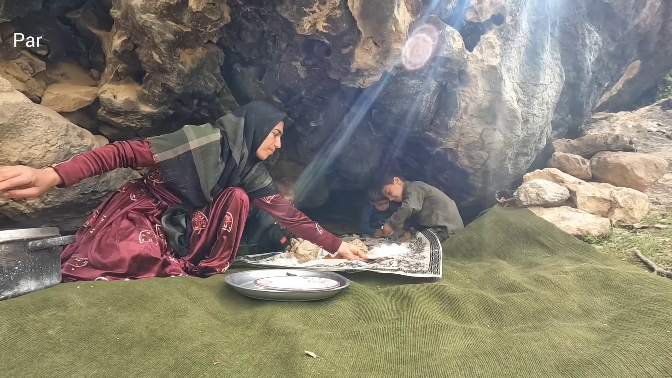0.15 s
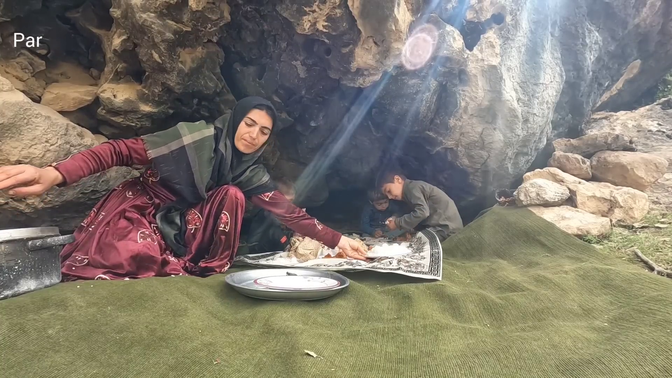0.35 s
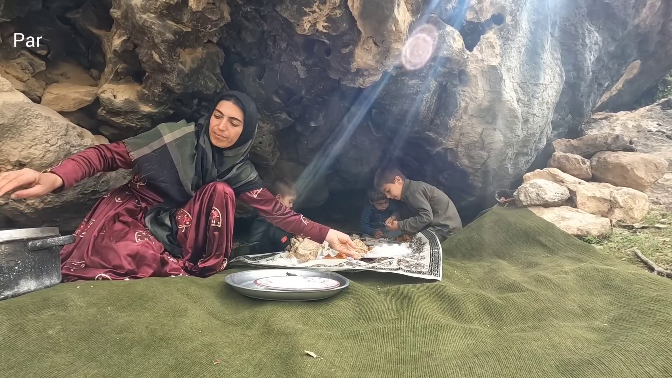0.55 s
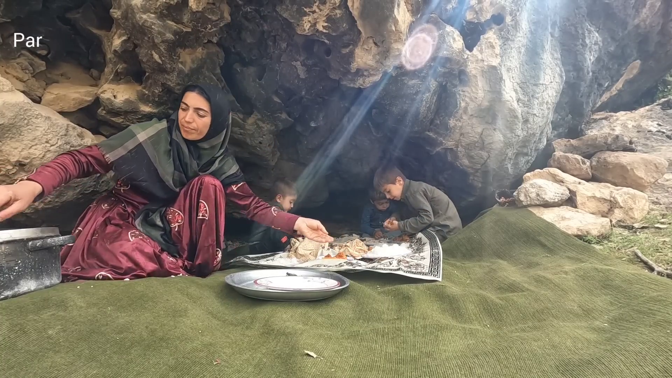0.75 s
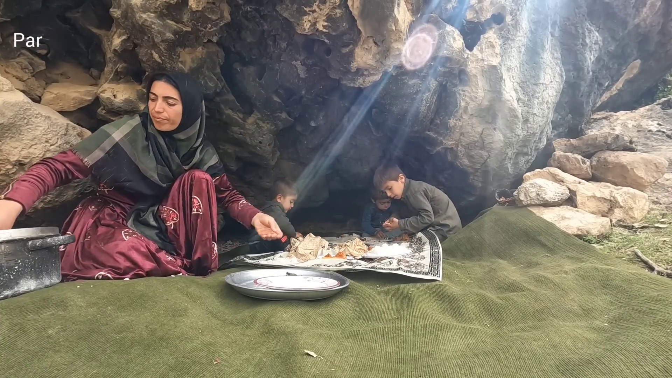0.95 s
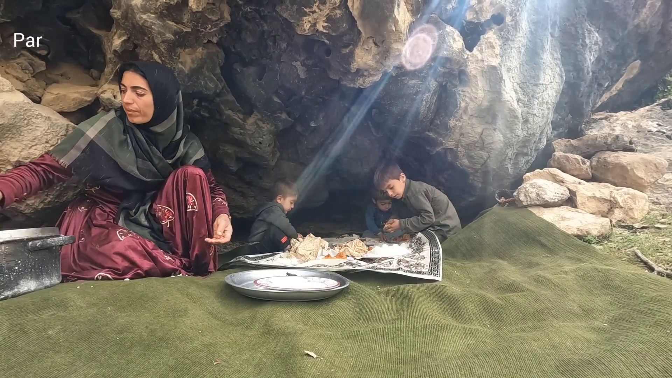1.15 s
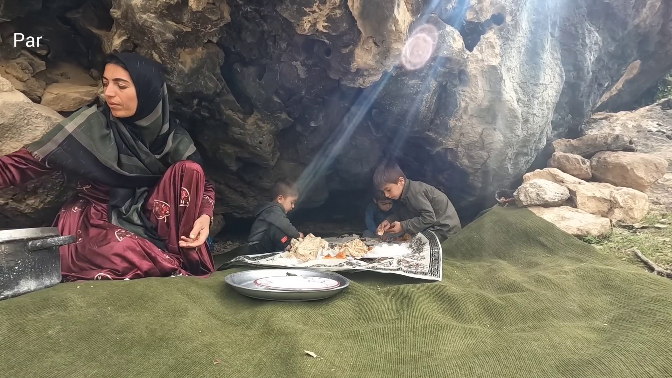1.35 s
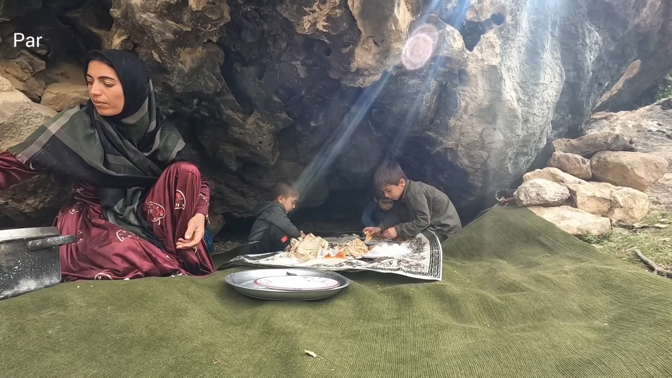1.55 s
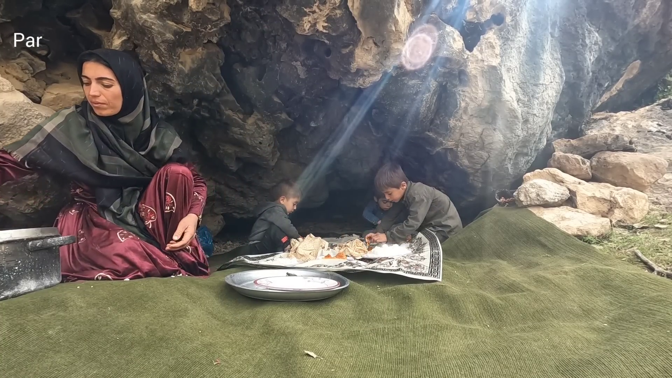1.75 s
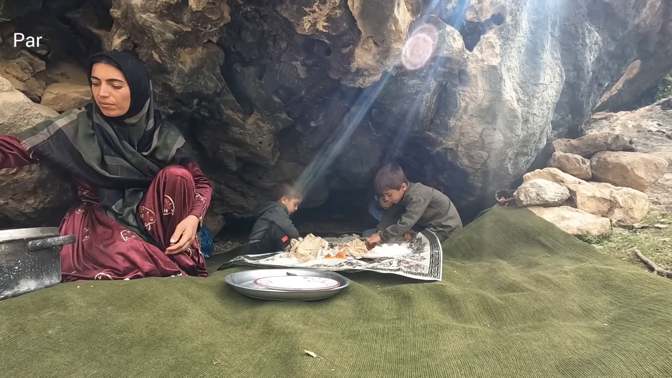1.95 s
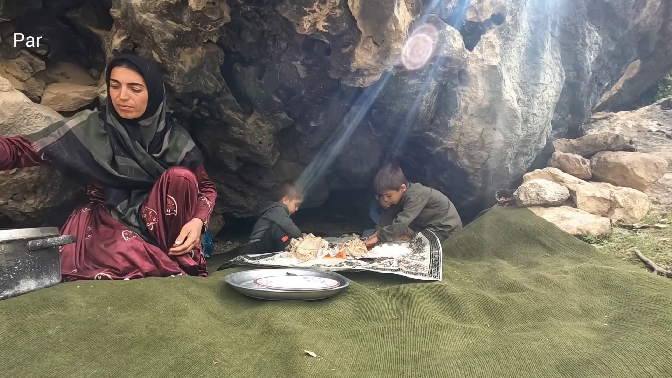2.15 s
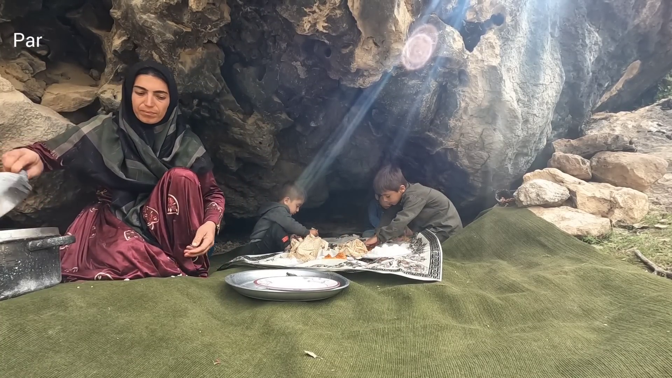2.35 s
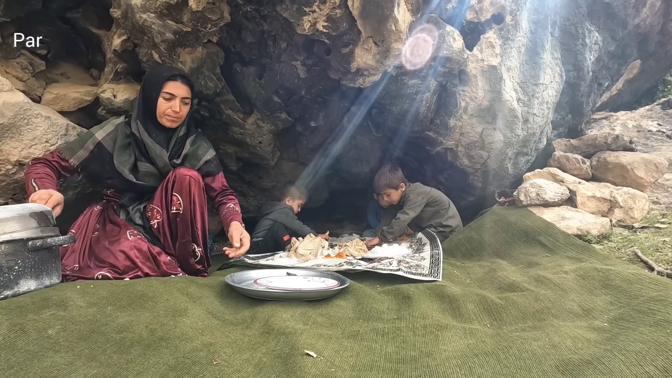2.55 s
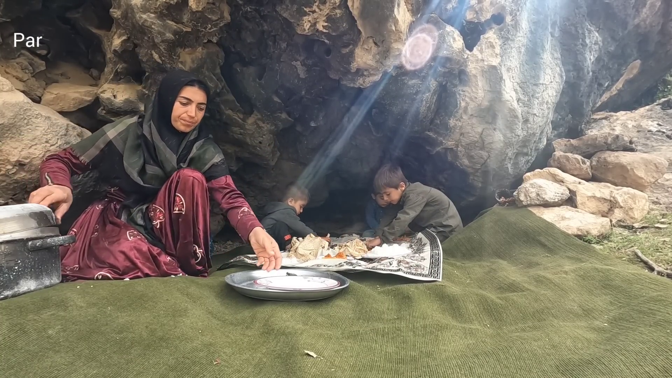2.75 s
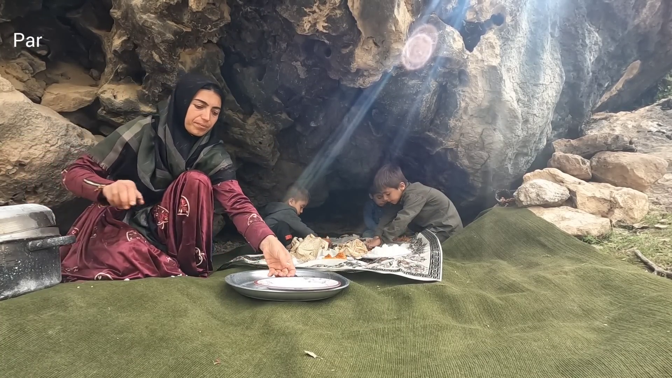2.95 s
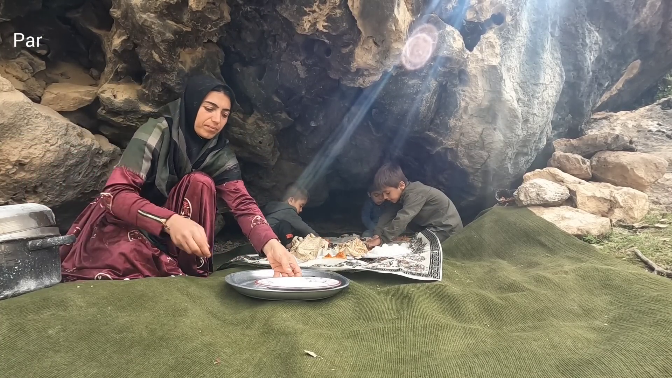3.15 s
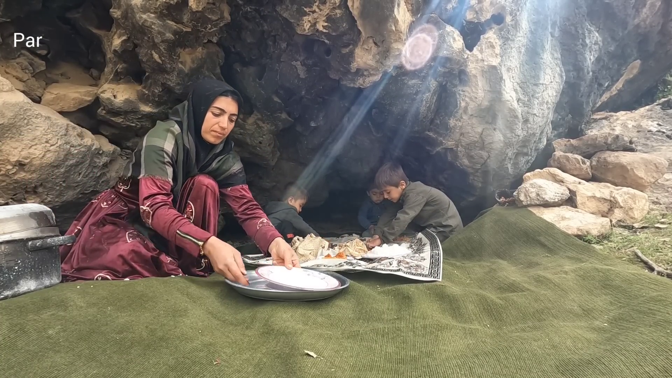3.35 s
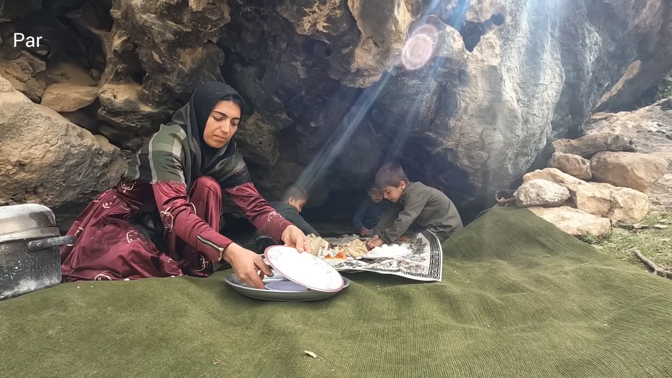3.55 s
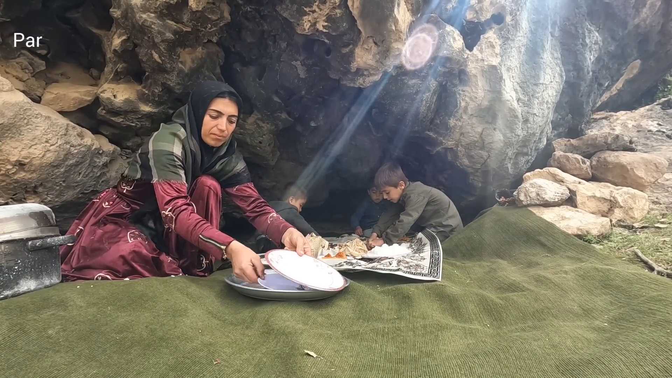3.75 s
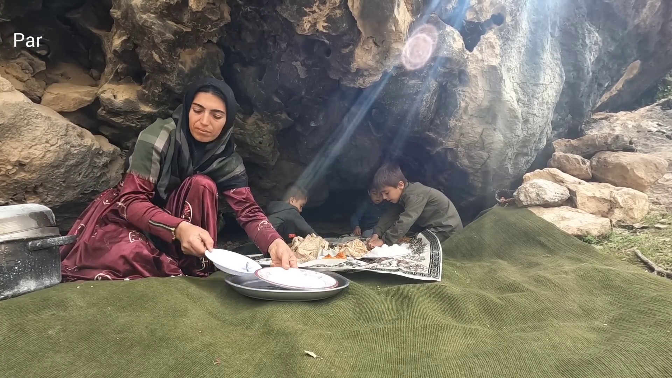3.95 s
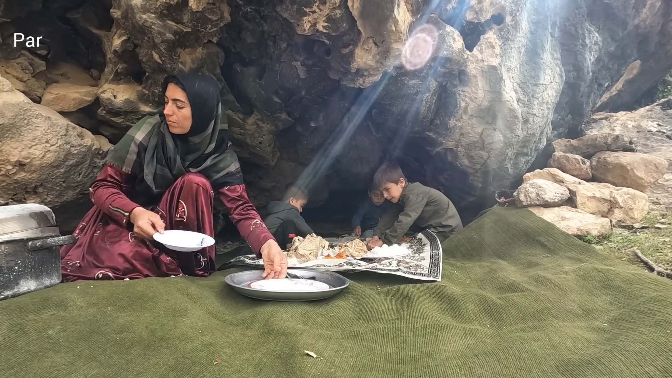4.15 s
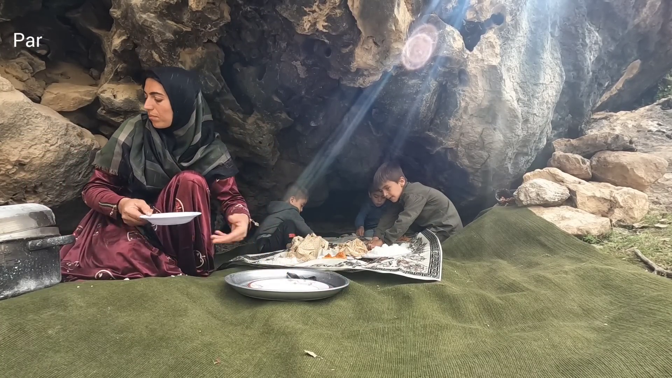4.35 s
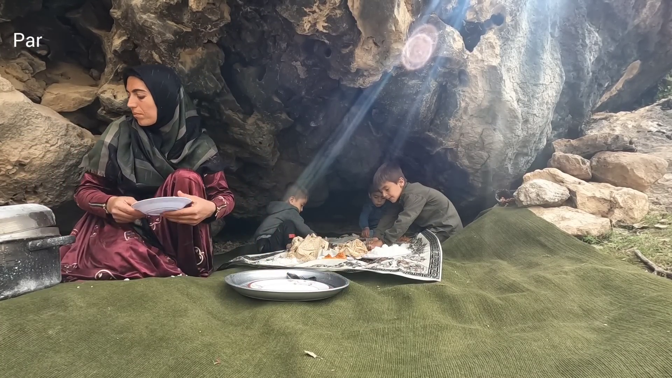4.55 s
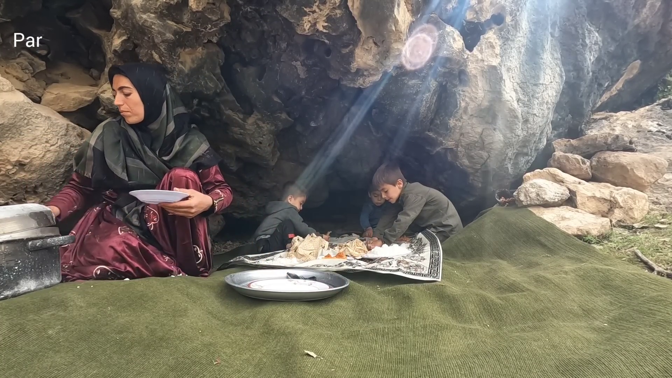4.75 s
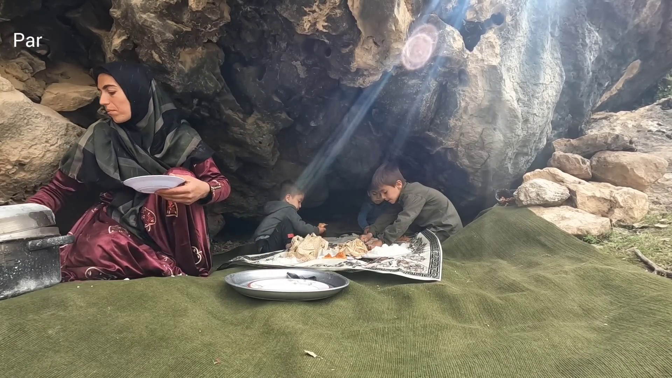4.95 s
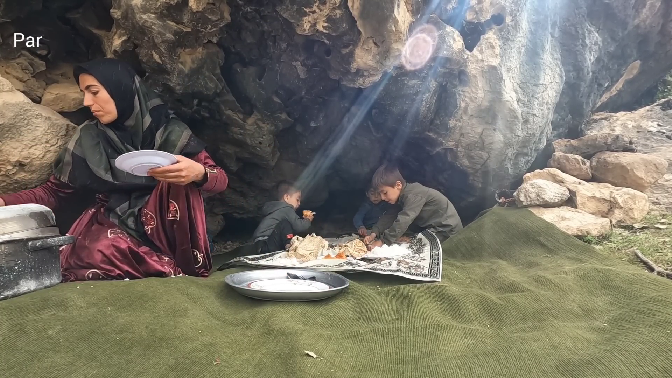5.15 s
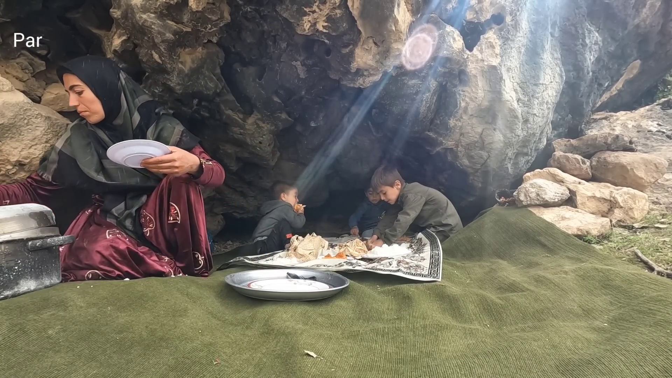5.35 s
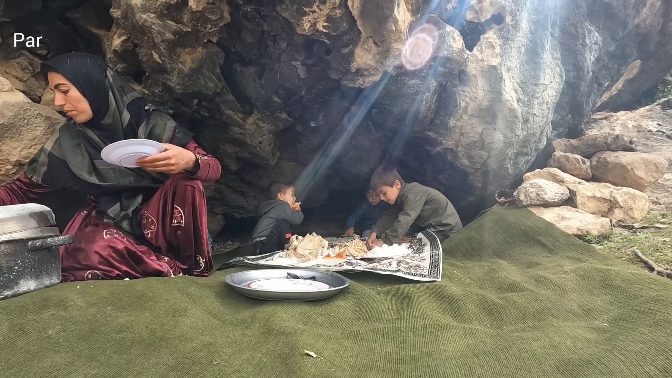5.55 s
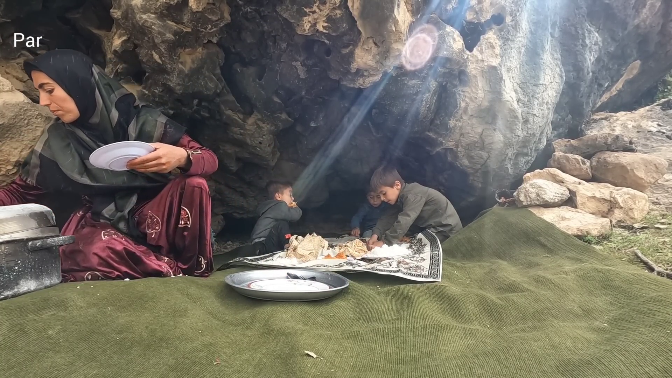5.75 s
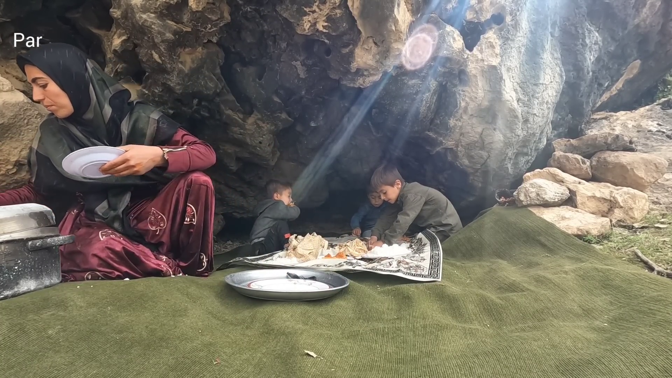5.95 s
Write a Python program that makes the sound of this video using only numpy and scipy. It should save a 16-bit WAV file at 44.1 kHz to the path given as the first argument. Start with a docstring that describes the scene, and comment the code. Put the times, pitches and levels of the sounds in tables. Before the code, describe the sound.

Outdoors under rock, faint dish taps and a distant bird, then a metal lid clangs onto a pot, plates clatter on a tray, and the lid rings.

```python
"""A metal lid dropped onto a cooking pot is the main source of a meal on a carpet under a rock overhang.
Small taps, a scraping spoon and a far bird come first; then plates knock and slide on a metal tray, and the
lid is shifted and rings. Impacts sum decaying modes and banded noise, friction feeds random slips to
resonators, the bird is a sum of harmonics through a throat resonance, and the air is filtered noise."""
import sys
import numpy as np
from scipy import signal
from scipy.fft import rfft, irfft, next_fast_len
from scipy.io import wavfile

SR = 44100
rng = np.random.default_rng(int(sys.argv[2]) if len(sys.argv) > 2 else 0)


def dump_mix(stems):
    """Bounce the given channels to the path in sys.argv[1] as a 16-bit WAV at rate SR."""
    frames = np.atleast_2d(stems).T  # one column per channel
    limited = np.clip(frames, -1, 1)  # hard clip at full scale
    pcm = np.round(limited * 32767).astype(np.int16)
    wavfile.write(sys.argv[1], SR, pcm)


N = 268833

# Source levels are relative: the gain on each layer and the final rounding of peaks come after them.


def from_db(db):
    """Level to amplitude ratio: 20 dB for each factor of ten."""
    return np.exp(np.asarray(db) * (np.log(10) / 20))


def rms_one(x):
    """Normalisation to unit root mean square."""
    return x / np.sqrt(np.mean(x ** 2) + 1e-20)


def seconds():
    """The time axis of the whole scene, in s."""
    return np.arange(N) / SR


def ages(length_s):
    """Time elapsed since an onset, in s."""
    return np.arange(int(length_s * SR) + 2) / SR


def add(out, start, sound):
    """Linear superposition: mix a sound in from a start time in s."""
    part = out[round(start * SR):][:len(sound)]
    part += sound[:len(part)]


def butter(x, hz, kind, order=3):
    """Maximally flat band selection."""
    return signal.sosfilt(signal.butter(order, hz, kind, fs=SR, output="sos"), x)


def coloured(x, spectrum, share=1):
    """Linear filtering: a (f/Hz, level/dB) table, interpolated over log frequency, weights the spectrum."""
    size = next_fast_len(len(x) + 4096, real=True)
    hz, db = np.transpose(spectrum)
    log_hz = np.log(np.maximum(np.arange(size // 2 + 1) * SR / size, 1))
    gain = from_db(share * np.interp(log_hz, np.log(hz), db))
    return irfft(rfft(x, size) * gain, size)[:len(x)]


def resonate(x, hz, width_hz):
    """A damped resonator: two poles whose radius sets the bandwidth, with gain 1 on top."""
    r = np.exp(-np.pi * width_hz / SR)
    zeros = np.array([1, 0, -1]) * (1 - r * r) / 2
    poles = [1, -2 * r * np.cos(2 * np.pi * hz / SR), r * r]
    return signal.lfilter(zeros, poles, x + 1e-18)


def waver(corner_hz):
    """Slow random modulation: noise through two equal poles, drawn at every 40th sample; rms 1."""
    r = np.exp(-80 * np.pi * corner_hz / SR)
    slow = signal.lfilter([1], [1, -2 * r, r * r], rng.standard_normal(N // 40 + 502))[500:]
    return np.interp(np.arange(N) / 40, np.arange(len(slow)), rms_one(slow))


def burst(t60):
    """Diffuse reverberation: exponentially decaying noise of unit energy."""
    t = ages(t60)
    tail = rng.standard_normal(len(t)) * np.exp(-np.log(1000) * t / t60)
    return tail / np.linalg.norm(tail)


def ring(hz, t60, contact_s=0.0025):
    """Modal vibration: a sinusoid built up during the contact under an exponential decay."""
    t = ages(t60)
    decay = np.exp(-np.log(1000) / t60 * t)
    return np.sin(2 * np.pi * hz * t) * decay * (1 - np.exp(-t / contact_s))


def chatter(per_s, spread_db, smooth, size=N):
    """Random micro-impacts: uneven contacts of two hard surfaces over a smooth rub; rms 1."""
    chance, sizes, rub = rng.random(size), rng.exponential(1, size), rng.standard_normal(size)
    contacts = from_db(spread_db * np.minimum(sizes, 3)) * np.sign(rub) * (chance < per_s / SR)
    return rms_one(rms_one(contacts) + smooth * rub)


USUAL_BLOW_DB = -30


def blows_of(knocks, ring_db, ring_follows, thud_db, thud_follows, cushion, t60):
    """Impact scaling: strength drives ring and thud, hardness trades thud for treble.

    Rows: t/s, ring/dB, thud/dB, body/dB, bright/dB, t60/s."""
    blows = []
    for start, db, hard_db in knocks:
        excess_db = db - USUAL_BLOW_DB
        thud = thud_db + thud_follows * excess_db - cushion * hard_db
        blows.append((start, ring_db + ring_follows * excess_db, thud, db, db + hard_db, t60))
    return blows


THUD_HZ, BRIGHT_HZ = 450, 2500   # edges of the thud, body and bright bands


def clatter(blows, colour, modes, metal, thud_life, bright_life, onset_s):
    """High modal density: coloured noise stands for crowded modes, and three bands decay at their own rates."""
    rattle = chatter(per_s=3100, spread_db=4.5, smooth=0.96)
    body = sum(resonate(signal.unit_impulse(SR // 10), hz, 21.0) for hz, _, _ in modes)
    rattle = coloured(rattle + metal * signal.oaconvolve(rattle, body)[:N], colour)
    thud = butter(rattle, THUD_HZ, "low")
    middle = butter(rattle, [THUD_HZ, BRIGHT_HZ], "band")
    bright = butter(rattle, BRIGHT_HZ, "high")
    out = np.zeros(N)
    for k, (band, life) in enumerate(zip((thud, middle, bright), (thud_life, 1, bright_life))):
        power = np.zeros(N)   # overlapping blows add in power
        for start, _, *band_db, t60 in blows:
            t = ages(t60 * life)
            envelope = from_db(band_db[k] - 60 * t / (t60 * life)) * (1 - np.exp(-t / onset_s))
            add(power, start, envelope ** 2)
        out += rms_one(band) * np.sqrt(power)
    return out


MIDDLE_HZ = 1000   # a hard blow lifts the modes above this and lowers those below


def ringing(blows, modes, scatter_db, hardness, detune=0):
    """Modal excitation: harder blows favour high modes; each contact loads the body a little differently."""
    out = np.zeros(N)
    usual_db = np.mean([bright_db - body_db for _, _, _, body_db, bright_db, _ in blows])
    for start, ring_db, _, body_db, bright_db, _ in blows:
        excess_db = hardness * (bright_db - body_db - usual_db)
        chances = rng.standard_normal((len(modes), 2))
        for (hz, mode_db, t60), (luck, load) in zip(modes, chances):
            tilt_db = excess_db * np.log2(hz / MIDDLE_HZ)
            gain = from_db(ring_db + mode_db + tilt_db + scatter_db * luck)
            add(out, start, gain * ring(hz * (1 + detune * load), t60))
    return out


def seated(tone, start, below_hz, db_per_s):
    """Contact damping: once a body is seated, its low modes choke."""
    free = from_db(-db_per_s * np.maximum(seconds() - start, 0))
    return free * tone + (1 - free) * butter(tone, below_hz, "high", order=4)


def rubbed(strokes, peaks, colour, per_s, rub_db, flutter_db, swell_db_per_s, release_db_per_s):
    """Friction excitation: slips feed resonances over a broad rub, swelling with the push, then dying away."""
    out = np.zeros(N)
    t = ages(1)
    knots = t[::SR // 40]   # the grip on each resonance is redrawn 40 times a second
    for start, length, db in strokes:
        slips = chatter(per_s, spread_db=1.5, smooth=0.91, size=len(t))
        grips = [np.interp(t, knots, row) for row in rng.standard_normal((len(peaks), len(knots)))]
        sung = np.zeros(len(t))
        for (hz, width_hz, peak_db), grip in zip(peaks, grips):
            sung += from_db(peak_db + flutter_db * grip) * resonate(slips, hz, width_hz)
        rub = rms_one(rms_one(sung) + from_db(rub_db) * rms_one(coloured(slips, colour)))
        fall_db = np.maximum(swell_db_per_s * (length - t), release_db_per_s * (t - length))
        add(out, start, rub * from_db(db - fall_db))
    return out


# spectrum of the open air: f/Hz, level/dB
AIR_SPECTRUM = [(13, 1.5), (22, 2.5), (97, -7.5), (192, -4), (382, -12.5), (516, -12), (560, -19.5),
                (846, -27), (1020, -18.5), (2210, -24), (2680, -24.5), (7390, -38), (11200, -55),
                (12400, -45.5), (15500, -71)]
# someone leans and reaches, stirring air and cloth: middle t/s, length t/s, level/dB
MOVES_STIRRING_AIR = [(0.06, 1, -48), (3.734, 0.97, -53), (4.335, 0.68, -47.5), (5.053, 0.5, -46),
                      (5.83, 1, -47)]
STILL_AIR_DB, HISS_DB = -54.5, -57.5
CLOTH_DB = -5.5   # rustle relative to the rumble of a movement


def air():
    """Turbulence noise: soft rumble under faint hiss; each movement adds rumble and a rustle of cloth."""
    noise = coloured(rng.standard_normal(N), AIR_SPECTRUM)
    stir = np.zeros(N)
    for middle, length, db in MOVES_STIRRING_AIR:
        stir += from_db(db) * np.cos(np.pi * np.clip((seconds() - middle) / length, -.5, .5)) ** 2
    rumble = rms_one(butter(noise, 380, "low")) * np.hypot(from_db(STILL_AIR_DB), stir)
    rumble = rumble * from_db(2 * waver(2.7))   # the air moves in soft puffs
    hiss = np.hypot(from_db(HISS_DB), from_db(CLOTH_DB + 0.83 * waver(54)) * stir)
    return rumble + hiss * rms_one(butter(noise, 255, "high"))


# small taps of spoons and dishes: t/s, level/dB, hardness (treble over body) level/dB
DISH_TAPS = [(0.068, -37.5, -12.5), (0.103, -45, -21.5), (0.138, -41, -11.5), (0.189, -35, -10.5),
             (0.231, -58, 3), (1.135, -53, 5), (1.287, -43.5, -0.5), (1.784, -58.5, -14), (1.939, -56, 12)]
# clear modes of a dish: f/Hz, level/dB, t60 t/s
DISH_RINGS = [(561, -3, 0.14), (674, -20.5, 0.5), (840, -20, 0.43), (1310, 7, 0.043), (1463, -42, 0.061),
              (2440, -8.5, 0.086), (2630, -16, .12), (3980, -25, 0.22)]
# colour of a dish's dense, short-lived modes: f/Hz, level/dB
DISH_SPECTRUM = [(47, -38), (80, -12), (193, -0.5), (314, -11.5), (556, -0.5), (1010, -8), (1500, -1.5),
                 (1870, -13), (2900, -7.5), (12400, -42.5), (15500, -68)]


def taps():
    """Impact of small bodies: light taps wake the dense and the clear modes of a dish."""
    blows = blows_of(DISH_TAPS, ring_db=-17.5, ring_follows=1.0, thud_db=-44.5, thud_follows=0.31,
                     cushion=0.49, t60=0.13)
    knocks = clatter(blows, DISH_SPECTRUM, DISH_RINGS, metal=0.71, thud_life=1.67, bright_life=0.83,
                     onset_s=0.0014)
    tone = ringing(blows, DISH_RINGS, scatter_db=5.0, hardness=0.22, detune=0.026)
    return from_db(-0.5) * knocks + from_db(-18.0) * tone


# distant bird: t/s, length t/s, start pitch f/Hz, top pitch f/Hz, level/dB
BIRD_CALLS = [(0.072, 0.19, 569.6, 746, -47), (0.72, 0.056, 758, 970, -52.5),
              (1.028, 0.062, 768, 997, -51.5)]
BIRD_ARCH_S = 0.2   # a full call rises and falls in this time; short ones break off on the way up


def bird():
    """Source and filter: hoarse arching harmonics pass a throat resonance and are smeared by the cliffs."""
    out, tremor = np.zeros(N), 1 + .022 * waver(120)
    for start, length, start_hz, top_hz, db in BIRD_CALLS:
        t = ages(length)
        arch_hz = start_hz + (top_hz - start_hz) * np.sin(np.pi * t / BIRD_ARCH_S)
        phase = 2 * np.pi * np.cumsum(arch_hz * tremor[round(start * SR):][:len(t)]) / SR
        swell = np.sqrt(np.abs(np.sin(np.pi * t / length)))
        harmonics = sum(np.sin(k * phase) for k in range(2, 6))   # the fundamental is absent
        add(out, start, from_db(db) * swell * harmonics)
    out = resonate(out, 2640, 570)
    return .5 * out + signal.oaconvolve(out, burst(t60=0.67))[:N]


# a spoon drawn across a plate: t/s, time to the peak t/s, peak level/dB
SPOON_STROKES = [(1.134, 0.041, -39)]
# resonances under the spoon: f/Hz, width f/Hz, level/dB
SPOON_RESONANCES = [(1250, 74, -5.5), (1990, 33, -17), (2300, 24, 0), (2600, 25, -1.5), (3310, 18, 0),
                    (3985, 27, -5), (4800, 11, -7), (5320, 27, -9), (5780, 74, -9), (6870, 48, -15),
                    (7700, 38, -13.5), (9910, 43, -40), (11900, 51, -22), (13900, 62, -42)]
# colour of the spoon's broad rub: f/Hz, level/dB
SPOON_SPECTRUM = [(350, -51), (600, -9), (1230, -14.5), (1660, -12), (2310, 0), (2870, -6), (5820, -23),
                  (15500, -59)]


def spoon_scrape():
    """Sliding friction: the slips of a spoon on a plate excite narrow resonances."""
    return rubbed(SPOON_STROKES, SPOON_RESONANCES, SPOON_SPECTRUM, per_s=1000, rub_db=-1.5, flutter_db=6,
                  swell_db_per_s=170, release_db_per_s=142)


# notes of a loose spoon or small dish: t/s, f/Hz, level/dB, t60 t/s
LOOSE_TINGS = [(1.29, 566, -46.5, .3), (1.29, 840, -46, 0.12), (3.235, 3000, -34, 0.058),
               (3.872, 4011, -42, 0.18), (4.119, 3872, -32, 0.17), (4.154, 3872, -18, 0.063)]


def tings():
    """Single-mode vibration: each ting of a loose piece is one or two decaying sinusoids."""
    out = np.zeros(N)
    for start, hz, db, t60 in LOOSE_TINGS:
        add(out, start, from_db(db) * ring(hz, t60))
    return out


# the lid lands on the pot and rocks on the rim, each bounce sooner and weaker than the last
LANDING_S, LANDING_DB = 2.452, -19.5
ROCK_GAP_S, ROCK_SHRINK, ROCK_LOSS_DB, ROCK_HARDNESS_DB = 0.0375, 0.93, 3.5, -3


def rocking(count):
    """Inelastic rebound: gaps shrink geometrically and levels fall by equal steps of dB."""
    k = np.arange(count)
    gaps = ROCK_GAP_S * ROCK_SHRINK ** k
    starts = LANDING_S + np.cumsum(gaps) - gaps
    return [(start, db, ROCK_HARDNESS_DB) for start, db in zip(starts, LANDING_DB - ROCK_LOSS_DB * k)]


# the lid then drops into its seat: t/s, level/dB, hardness (treble over body) level/dB
LID_SEATING = [(2.611, -28, -3), (2.669, -32.5, -5)]
# clear modes of the pot: f/Hz, level/dB, t60 t/s
POT_RINGS = [(288.8, -17.5, 0.87), (520.4, 0.5, 1), (653.5, -3.5, 0.44), (822, -1.5, 0.1),
             (886, -2.5, 0.34), (1027, -10.5, 1), (1160, -13.5, 0.79), (1488, -11.5, 0.44),
             (1598, -17, 0.43), (1775, -13.5, 0.64), (1895, -32, .5), (2033, 0, 0.047), (2390, -21, 0.15),
             (2640, -28.5, 0.24), (2873, -5, 0.19), (4350, -42, 0.4)]
# colour of the pot's dense, short-lived modes: f/Hz, level/dB
POT_SPECTRUM = [(47, -50), (80, -10), (281, -7), (456, -7), (509, -2), (594, -18), (649, -4.5), (725, -16),
                (845, -4.5), (1370, -13), (1530, -11), (2780, -25.5), (3030, -24), (12400, -42.5),
                (15500, -65)]
# the rim's hard clank at the first landing: f/Hz, level/dB, t60 t/s
RIM_CLANK = [(1420, -10.5, 0.056), (1930, -3.5, 0.05), (1978, -2.5, 0.055), (2790, -3, 0.027),
             (3100, -22, 0.033)]


def lid_drop():
    """Repeated impact: the lid rattles and settles; the pot rings from the two hardest contacts and the last."""
    blows = blows_of(rocking(count=5) + LID_SEATING, ring_db=-17.5, ring_follows=1.34, thud_db=-28.0,
                     thud_follows=-0.064, cushion=0.32, t60=0.18)
    crash = clatter(blows, POT_SPECTRUM, POT_RINGS, metal=0.77, thud_life=0.69, bright_life=0.8,
                    onset_s=0.002)
    tone = ringing(blows[:2] + blows[-1:], POT_RINGS, scatter_db=2, hardness=0.35)
    tone = seated(tone, start=2.68, below_hz=1880, db_per_s=360)
    clank = ringing(blows[:1], RIM_CLANK, scatter_db=5.5, hardness=0)
    return from_db(1.5) * crash + from_db(-14.5) * tone + from_db(-6) * clank


# the pot and the air in it boom as the lid closes; the last two rows are low thuds of handling: t/s, f/Hz,
# level/dB, rise t/s
POT_BOOMS = [(2.452, 182, -13, 0.0032), (2.630, 517, -25, 0.018), (2.672, 204, -25.5, 0.012),
             (5.204, 499, -17, 0.0086), (5.361, 492, -14, 0.0082), (5.389, 523.6, -24, 0.022),
             (5.612, 521, -37, 0.017), (5.685, 149, -37, 0.018), (5.744, 110, -32.5, 0.02)]


def booms():
    """Cavity resonance: a hollow note swells to a peak at its rise time and dies away."""
    out, t = np.zeros(N), ages(1 / 5)
    for start, hz, db, rise_s in POT_BOOMS:
        swell = (t / rise_s * np.exp(1 - t / rise_s)) ** 2
        add(out, start, from_db(db) * swell * np.sin(2 * np.pi * hz * t))
    return out


# plates against the tray: t/s, level/dB, hardness (treble over body) level/dB
TRAY_KNOCKS = [(2.984, -49, -16), (3.094, -53, -5), (3.233, -42.5, 1), (3.298, -49, -9),
               (3.343, -39, -34.5), (3.412, -27.5, -15), (3.438, -28, -11.5), (3.465, -33, -8.5),
               (3.724, -39.5, -12), (3.823, -17, -7), (3.885, -34.5, -5.5), (3.955, -35.5, -19),
               (4.061, -18.5, -4), (4.12, -29, -5.5), (4.154, -21.5, -5), (4.181, -15.5, -5),
               (4.2, -26.5, 6), (4.242, -28, -2), (4.29, -16, -4.5), (4.328, -24, -2)]
# clear modes of the tray: f/Hz, level/dB, t60 t/s
TRAY_RINGS = [(603, -14.5, 0.87), (636, -3.5, 0.22), (728, -14.5, 0.47), (987, -3.5, 0.24),
              (1034, -4.5, 0.2), (1161, -4, 0.24), (1245, -16.5, 0.61), (1474, -7, 0.13),
              (1590, -18.5, 0.6), (1870, -19.5, 0.6), (1885, -8, 0.16), (2030, -25, 0.21),
              (2473, -24, 0.27), (2740, -14, 0.18), (2930, -13.5, 0.27), (3620, -21, 0.23),
              (4810, -19, 0.089), (5730, -42, 0.21)]
# colour of the tray's dense, short-lived modes: f/Hz, level/dB
TRAY_SPECTRUM = [(47, -47), (80, -9), (139, -8.5), (189, -9.5), (350, -3), (487, -4), (581, -4.5), (774, 0),
                 (1180, -2.5), (1340, 1.5), (1470, 0.5), (2600, -10.5), (7170, -20), (12200, -36),
                 (15500, -54)]
# plates pushed over the tray: t/s, time to the peak t/s, peak level/dB
PLATE_SLIDES = [(3.34, 0.12, -38.5), (3.87, 0.037, -42.5), (3.95, 0.25, -23.5), (4.24, 0.023, -26),
                (4.30, 0.042, -21)]
# resonances under the sliding plates: f/Hz, width f/Hz, level/dB
TRAY_RESONANCES = [(595, 11, -19), (1073, 52, 15), (1500, 35, 5), (1670, 42, 11), (2245, 6, 18),
                   (2350, 29, 15), (2740, 7.8, 15), (3060, 42, 9), (3460, 55, 2), (4070, 39, -17),
                   (4610, 54, -24), (6400, 43, -19), (6600, 28, -15), (7140, 120, -32), (7100, 29, -26),
                   (7600, 17, -22)]


def plates():
    """Impact and sliding friction: plates knock on the tray and are dragged over it."""
    blows = blows_of(TRAY_KNOCKS, ring_db=-18, ring_follows=0.77, thud_db=-40, thud_follows=0.5,
                     cushion=-0.091, t60=0.13)
    knocks = clatter(blows, TRAY_SPECTRUM, TRAY_RINGS, metal=0.33, thud_life=1.8, bright_life=1.0,
                     onset_s=0.0006)
    tone = ringing(blows, TRAY_RINGS, scatter_db=2.5, hardness=0.6, detune=0.013)
    tone = seated(tone, start=4.37, below_hz=3300, db_per_s=255)
    drag = rubbed(PLATE_SLIDES, TRAY_RESONANCES, TRAY_SPECTRUM, per_s=1000, rub_db=8.5, flutter_db=2.0,
                  swell_db_per_s=123, release_db_per_s=386)
    return from_db(-2) * knocks + from_db(-18) * tone + from_db(-0.5) * drag


# lid shifted on the rim: t/s, level/dB, hardness (treble over body) level/dB
RIM_TAPS = [(4.992, -46.5, -7.5), (5.108, -39, -14), (5.137, -36.5, -10), (5.18, -36, -5), (5.207, -22, -8),
            (5.262, -33, 4.5), (5.364, -33, -3), (5.392, -30, -3), (5.578, -38, 7.5), (5.649, -24, -4),
            (5.703, -30, -4.5), (5.727, -34, -8), (5.756, -39.5, -13)]
# clear modes of the lid: f/Hz, level/dB, t60 t/s
LID_RINGS = [(532.2, -2.5, 0.68), (795, -8.5, 0.42), (1090, -15, 0.68), (1515, -15, 1), (1624, -11, 1.0),
             (1970, -26, 0.91), (2020, -17, 0.29), (2140, -19.5, 0.59), (2628, -16, 0.38),
             (2790, -33, 0.23), (3600, -27, 0.74), (4490, -18.5, 0.23), (5600, -19, 0.19),
             (6260, -5, 0.029)]
# colour of the lid's dense, short-lived modes: f/Hz, level/dB
LID_SPECTRUM = [(47, -34), (80, -8.5), (294, -1), (400, -3.5), (509, -3.5), (649, -19.5), (809, -9.5),
                (965, -12.5), (1710, -15), (2380, -33), (2600, -27.5), (3310, -30), (12200, -53.5),
                (15500, -85)]


def lid_shift():
    """Free and damped vibration: the lifted lid taps the rim and rings freely until it is put down."""
    blows = blows_of(RIM_TAPS, ring_db=-19.5, ring_follows=0.84, thud_db=-37.5, thud_follows=0.45,
                     cushion=0.81, t60=0.13)
    knocks = clatter(blows, LID_SPECTRUM, LID_RINGS, metal=2.27, thud_life=0.68, bright_life=0.85,
                     onset_s=0.0004)
    tone = ringing(blows, LID_RINGS, scatter_db=1.5, hardness=0.54, detune=0.00098)
    tone = seated(tone, start=5.74, below_hz=2060, db_per_s=179)
    return knocks + from_db(-18.5) * tone


# stereo width before the opening: f/Hz, side minus mid level/dB
STEREO_WIDTH = [(35, -12), (120, -24), (600, -18), (1300, -11), (2800, -6), (9000, -7), (13000, -2.5)]
# stereo balance: f/Hz, left minus right level/dB
STEREO_LEAN = [(300, 0.036), (2500, 0.71), (9000, 1.3), (13000, 5)]
# the image is nearly mono at first and opens steadily; the top treble is always wide
OPENS_S, OPENING_TAKES_S, CLOSED_DB, ALWAYS_WIDE_HZ = 2, 2.9, -28, 10200


def scene():
    """Reverberation and diffusion: the rock gives a faint tail; scattered sound widens the treble."""
    dishes = taps() + spoon_scrape() + tings() + lid_drop() + booms() + plates() + lid_shift()
    tail = signal.oaconvolve(butter(dishes, 2600, "low", order=1), burst(t60=0.24))[:N]
    mid = dishes + from_db(-16) * tail + bird() + air()
    side = coloured(mid * np.sqrt(2) * np.sin(3 * waver(26.2)), STEREO_WIDTH)
    opened = np.clip((seconds() - OPENS_S) / OPENING_TAKES_S, from_db(CLOSED_DB), 1)
    side = opened * side + (1 - opened) * butter(side, ALWAYS_WIDE_HZ, "high", order=2)
    left = coloured(mid + side, STEREO_LEAN, share=1 / 2)
    right = coloured(mid - side, STEREO_LEAN, share=-1 / 2)
    return np.array([left, right])


CUTOFF_HZ = 15100


def record(dry):
    """Saturation and band limiting: the hardest peaks are rounded, the top is cut."""
    top = .55
    rounded = top * np.tanh(dry / top)
    return signal.sosfilt(signal.ellip(10, .1, 80, CUTOFF_HZ, fs=SR, output="sos"), rounded)


dry = scene()
out = record(dry)
dump_mix(out)
```